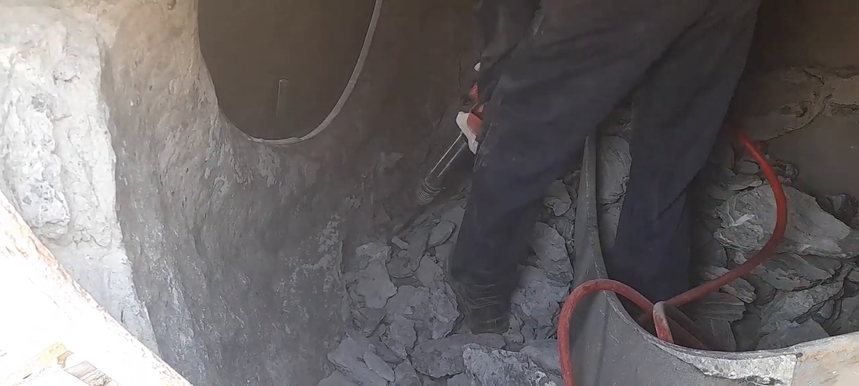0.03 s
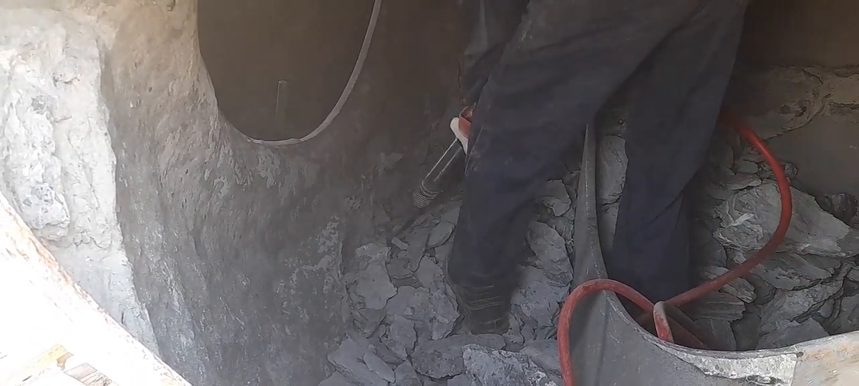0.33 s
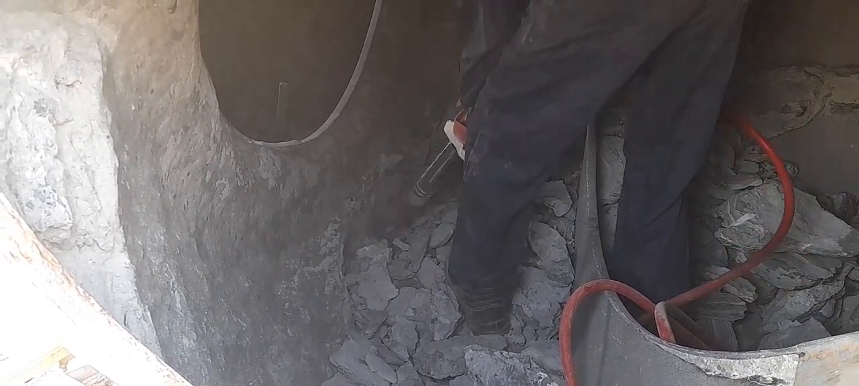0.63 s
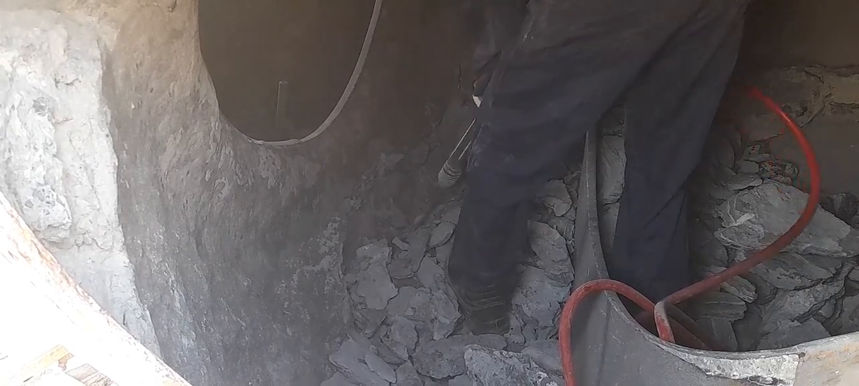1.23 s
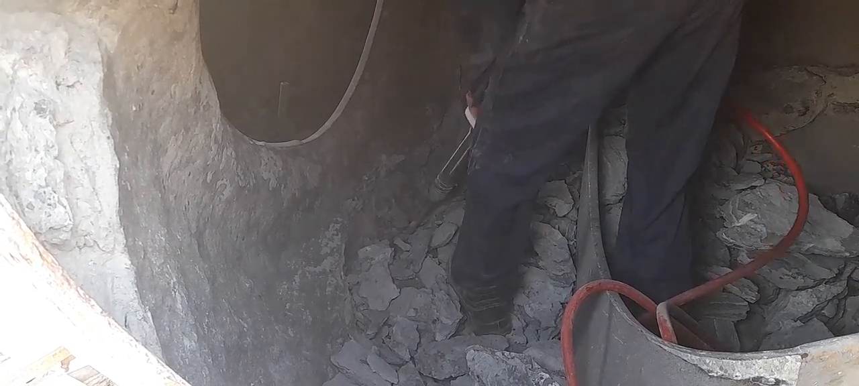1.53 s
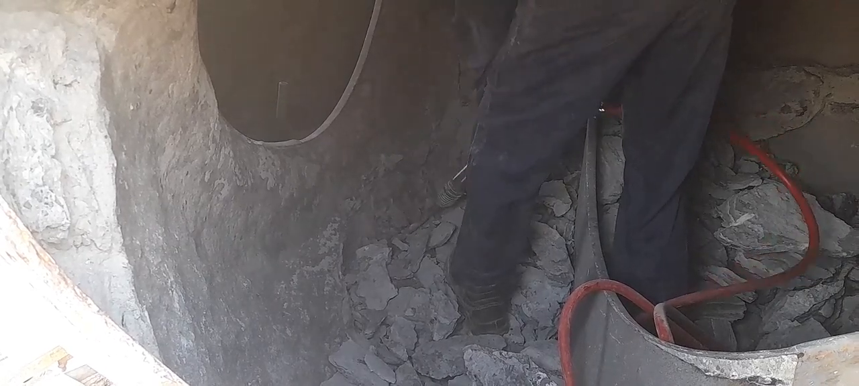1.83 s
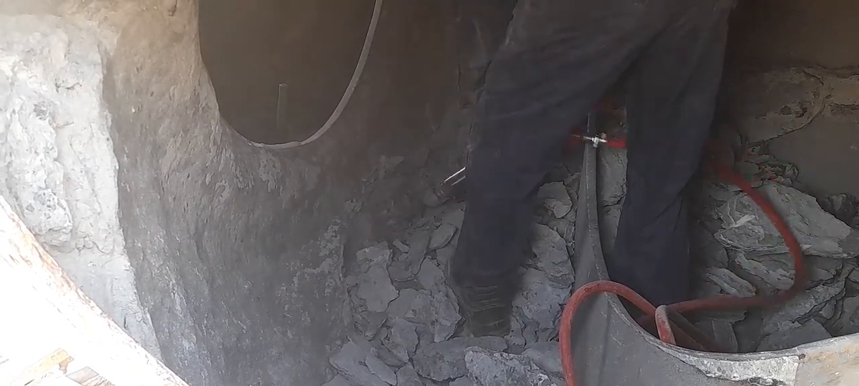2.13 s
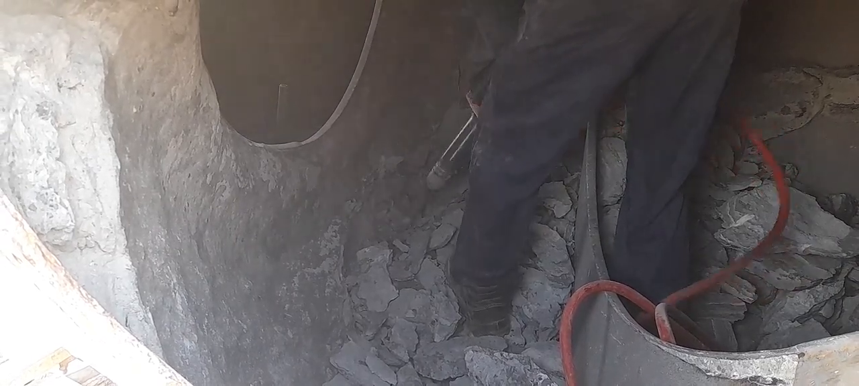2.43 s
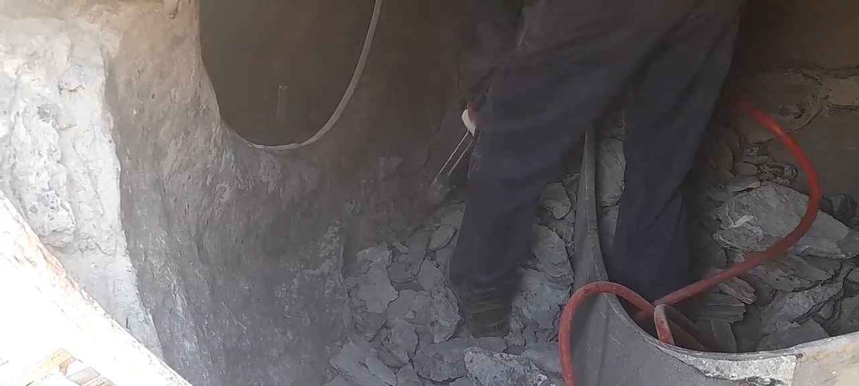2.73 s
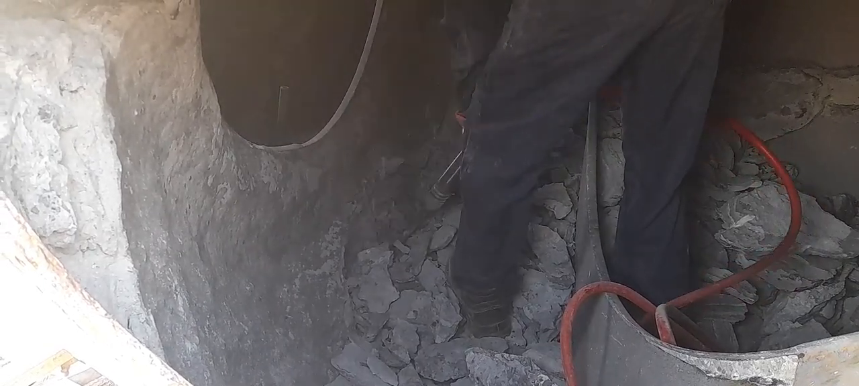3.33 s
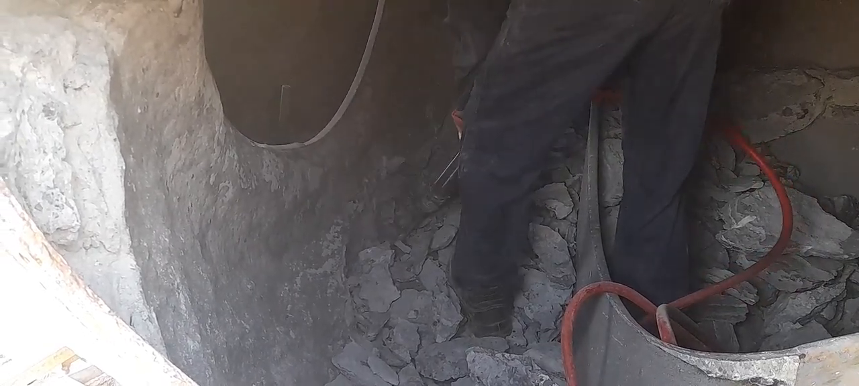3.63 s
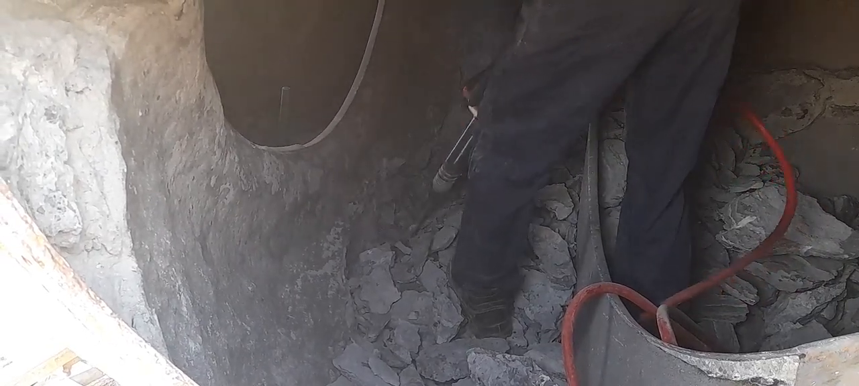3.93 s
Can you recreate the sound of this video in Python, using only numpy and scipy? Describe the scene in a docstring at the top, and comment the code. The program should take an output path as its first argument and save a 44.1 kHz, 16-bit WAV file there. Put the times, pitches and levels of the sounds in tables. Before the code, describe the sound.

Pneumatic hammer breaking concrete in a mixer drum, three rapid bursts over an idling engine.

```python
"""Inside a steel mixer drum, a pneumatic hammer chips concrete in three short bursts while an engine
idles outside. Each blow is a spit of air, a crack and a thud, echoing in the drum over a gritty roar
and exhaust hiss. The loose chisel clinks and chunks of concrete fall. Twice the exhaust air sweeps
the left microphone, which overloads with a flutter that drops in pitch as the jet dies."""
import sys
import numpy as np
from scipy import signal
from scipy.fft import rfft, irfft
from scipy.io import wavfile
from scipy.ndimage import uniform_filter1d, minimum_filter1d, map_coordinates

SR = 44100
rng = np.random.default_rng(int(sys.argv[2]) if len(sys.argv) > 2 else 0)


def unload_wav(signal):
    """Save mono or channel-first audio to the path in sys.argv[1] as 16-bit WAV at rate SR, clipped to [-1, 1]."""
    wavfile.write(
        sys.argv[1],
        SR,
        np.round(np.clip(np.atleast_2d(signal).T, -1, 1) * 32767).astype(np.int16),
    )


N = 176400
T = np.arange(N) / SR


def amp(db):
    """Decibels to gain."""
    return 10 ** (np.asarray(db) / 20)


def sides(left_db, right_db):
    """Stereo placement as a gain per channel."""
    return amp([[left_db], [right_db]])


def unit(x):
    """Scales to rms 1."""
    return x / np.sqrt(np.mean(x ** 2) + 1e-20)


def read(points, hz):
    """Reads a curve on a log-frequency axis."""
    f, value = np.transpose(points)
    return np.interp(np.log(hz + 1), np.log(f + 1), value)


def fader(rows, column=1):
    """Gain over time from a dB column; silent outside the rows."""
    rows = np.array(rows)
    return amp(np.interp(T, rows[:, 0], rows[:, column], left=-120, right=-120))


def add(mix, start_s, sound):
    """Mixes a sound in at start_s."""
    part = mix[..., max(round(start_s * SR), 0):][..., :sound.shape[-1]]
    part += sound[..., :part.shape[-1]]


# Stereo image, wider in the treble: freq_hz, correlation
STEREO_LIKENESS = [(50, 1), (250, 0.45), (700, 0.3), (2000, 0.083), (8000, .1)]

def pair(spectra, hz):
    """Makes two independent spectra partly alike."""
    left, other = spectra
    alike = read(STEREO_LIKENESS, hz)
    return np.array([left, alike * left + np.sqrt(1 - alike ** 2) * other])


def noise(colour):
    """Stereo noise of a given colour, falling away under its lowest point."""
    hz = np.fft.rfftfreq(N, 1 / SR)
    shape = amp(read(colour, hz)) * np.minimum(hz / colour[0][0], 1) ** 2
    white = rfft(rng.standard_normal((2, N)))
    return unit(irfft(pair(white, hz) * shape, N))


def wander(hz):
    """Smooth random motion up to a given rate."""
    rolloff = 1 + (np.fft.rfftfreq(N, 1 / SR) / hz) ** 4
    return unit(irfft(rfft(rng.standard_normal(N)) / rolloff, N))


# Idle hum and the whine above it: cycle_multiple, relative_db
HUM_ORDERS = [(1, -40), (2, -38), (3, -28.5), (4, 2.5), (5, -18.5), (6, -16.5), (7, -18.5), (8, -18),
              (9, -8.5), (10, -18.5), (11, -25), (12, -14.5), (13, -26), (14, -29), (15, -13.5),
              (16, -17.5), (17, -23.5), (18, -19), (19, -26.5), (20, -15), (21, -11), (22, -19.5),
              (23, -21.5), (24, -9.5), (25, -20), (26, -19), (27, -22.5), (28, -11), (29, -21), (30, -24),
              (31, -26), (32, -11.5), (33, -23.5), (34, -30.5)]
WHINE_ORDERS = [(48, -20), (60, -24), (72, -21.5), (84, -22)]
# Clatter colour: freq_hz, gain_db
CLATTER_EQ = [(59, -26), (100, 2.5), (215, -8.5), (244, -6), (452, -7), (481, -9.5), (524, -9.5),
              (634, -13), (768, -12), (1250, -19.5), (1390, -16.5), (4670, -31), (7940, -44.5),
              (12900, -40), (16000, -53.5)]
# Engine fader, pulled down for each burst: time_s, gain_db
ENGINE_FADER = [(0, 0), (.62, 2.1), (.7, -13.1), (.93, -20), (1.02, -2.5), (1.5, -3), (1.98, -2.5),
                (2.06, -7.5), (2.2, -4.5), (2.32, 1.9), (2.8, 1.96), (3.33, 1.1), (3.48, -8), (3.75, -19),
                (3.9, -17), (4, -2)]

def engine(cycle_hz=16.3):
    """Four cylinders idle: a harmonic hum, with clatter that pulses at each firing and each cycle."""
    speed_hz = cycle_hz * (1 + .003 * wander(3.5))
    turn = 2 * np.pi * np.cumsum(speed_hz) / SR
    hum = np.zeros((2, N))
    for order, db in HUM_ORDERS + WHINE_ORDERS:
        phase = order * turn + 2 * np.pi * rng.random()
        stereo_spread = .27 * min(order / 10, 1) * rng.standard_normal((2, 1))
        hum += amp(db) * np.cos(phase + stereo_spread)
    pulse = np.cos(4 * turn) + np.cos(turn)
    clatter = unit(noise(CLATTER_EQ) * np.exp(.1 * pulse))
    return fader(ENGINE_FADER) * (sides(-42.5, -38.5) * unit(hum) + sides(-47.5, -43.07) * clatter)


# The chisel's low and high ring: pitch_hz, relative_db, t60_s
CHISEL_LOW_MODES = [(3030, -13, 0.043), (5450, 4.5, 0.045), (5546, 4.5, 0.025)]
CHISEL_HIGH_MODES = [(8600, -9, 0.24), (9250, -16, .15), (12430, 1, 0.061), (12500, -11, .06)]

def chisel_ring(modes, rub_hz=160, rub_radians=.9, rise_s=.00089):
    """One ring of the steel's modes, roughened by rubbing in the holder."""
    t = T[:SR // 4]
    ring = np.zeros((2, len(t)))
    for hz, db, t60 in modes:
        rub = np.interp(t * rub_hz, np.arange(200), rng.standard_normal(200))
        phase = 2 * np.pi * (hz * t + rng.random((2, 1))) + rub_radians * rub
        ring += amp(db - 60 * t / t60) * np.sin(phase)
    return ring * np.minimum(t / rise_s, 1)


# Chisel clinks: start_s, low_ring_db, high_ring_db, tick_db
CLINK_HITS = [(.002, -35.5, -39, -25.5), (1.070, -51, -52, -60), (1.115, -51, -59, -58),
              (1.488, -55, -66, -49), (1.528, -51, -58, -31), (1.552, -41.5, -48, -47),
              (1.566, -43, -59, -58), (1.5881, -37, -39, -25.5), (2.646, -43, -43.5, -40),
              (2.678, -50, -53, -59.5), (2.7218, -29.5, -40, -30), (2.78, -43, -45, -40),
              (2.809, -35, -41, -41), (2.836, -43, -45, -33.5), (2.861, -55, -55, -35),
              (3.641, -28.5, -18, -36), (3.679, -29, -28, -36), (3.692, -33, -25, -40),
              (3.972, -62, -56, -43)]
# Falling chunks: start_s, level_db
CHUNK_HITS = [(.001, -27.5), (1.590, -38), (1.602, -37), (1.622, -39), (2.850, -26.5)]
# Stony knock, and the bright crack of ticks and hammer blows: freq_hz, gain_db
STONE_EQ = [(300, -12), (850, -8.5), (1100, -3), (1500, -2.5), (1850, -16), (2150, -12), (2600, -8.5),
            (3600, -17.5), (9000, -31)]
CRACK_EQ = [(500, -23.5), (1500, -0.5), (2800, 2.5), (4000, -3.5), (5600, 3), (7700, -11.5), (9800, 2.5),
            (12500, -2.5), (16000, -4.5)]

def chisel_and_chunks(tick_decay_s=.00067, knock_decay_s=.0035):
    """The chisel rattles in its holder and chunks knock on the rubble; both echo in the drum."""
    t = T[:SR // 20]
    steel, tick, knock = np.zeros((2, N)), np.zeros(N), np.zeros(N)
    for start_s, low_db, high_db, tick_db in CLINK_HITS:
        add(steel, start_s, amp(low_db) * chisel_ring(CHISEL_LOW_MODES))
        add(steel, start_s, amp(high_db) * chisel_ring(CHISEL_HIGH_MODES))
        add(tick, start_s, amp(tick_db) * np.exp(-t / tick_decay_s))
    for start_s, db in CHUNK_HITS:
        add(knock, start_s, amp(db) * np.exp(-t / knock_decay_s))
    ticks, stone = tick * noise(CRACK_EQ), knock * noise(STONE_EQ)
    echo = drum_echo(.22 * steel + stone + 1.43 * ticks)
    return (steel + ticks) * sides(-4.5, 0) + stone + amp(-6.5) * echo


# Reverb time of the drum: freq_hz, t60_s
DRUM_DECAY = [(100, .5), (500, 0.55), (2000, 0.64), (6000, 0.51), (10000, 0.24), (16000, 0.38)]

def drum_echo(send, build_s=.0045):
    """Dense echoes off the steel walls, each band dying at its own speed."""
    hz, t, bands = signal.stft(rng.standard_normal((2, SR)), SR, nperseg=256)
    bands = pair(bands, hz[:, None]) * amp(-60 * t / read(DRUM_DECAY, hz)[:, None])
    tail = signal.istft(bands, SR, nperseg=256)[1][:, :SR]
    tail *= 1 - np.exp(-T[:SR] / build_s)
    mono = send.mean(0)[None] * np.sqrt(2)
    return signal.fftconvolve(mono, tail / np.linalg.norm(tail[0]), axes=1)[:, :N]


# Hammer blows: start_s, crack_db, thud_db
BLOW_HITS = [(0.562, -30, -20), (.599, -19, -24), (.606, -24.5, -9.5), (0.652, -14, -17),
             (0.699, -15.5, -44), (0.742, -14, -13.5), (0.778, -16.5, -36), (0.825, -18, -19),
             (0.873, -23.5, -48), (0.962, -30, -40), (1.993, -16, -9.5), (2.034, -14, -8.5),
             (2.077, -16.5, -23), (2.116, -15, -13), (2.159, -18.5, -25), (2.199, -16.5, -17),
             (2.247, -21.5, -33), (2.320, -18, -29), (2.460, -29.5, -33), (2.54, -36, -48),
             (3.298, -17, -13.5), (3.354, -13.5, -13), (3.403, -13.5, -9.5), (3.452, -15, -21),
             (3.497, -11.5, -10), (3.539, -13.5, -13), (3.582, -12.5, -12.5), (3.629, -14.5, -12),
             (3.673, -9, -8.5), (3.726, -17, -14), (3.812, -42, -42)]
# Dull body of a blow: freq_hz, gain_db
THUD_EQ = [(50, -22.5), (150, -4), (300, 3.5), (550, 2), (850, -5), (1250, -2), (1900, -30), (2800, -19),
           (5000, -31.5)]

def hammer(rise_s=.0016, crack_decay_s=.0039, thud_decay_s=.0033, spit_s=.0061):
    """The valve spits just before the piston lands, then concrete cracks over a dull thud."""
    t, crack, thud = T[:SR // 10], np.zeros(N), np.zeros(N)
    rise = np.minimum(t / rise_s, 1)
    after_peak = np.maximum(t - rise_s, 0)
    for start_s, crack_db, thud_db in BLOW_HITS:
        add(crack, start_s - spit_s, amp(crack_db - 10.5) * rise * np.exp(-t / spit_s))
        add(crack, start_s, amp(crack_db) * rise * np.exp(-after_peak / crack_decay_s))
        add(thud, start_s, amp(thud_db) * rise * np.exp(-after_peak / thud_decay_s))
    blows = crack * noise(CRACK_EQ) + thud * noise(THUD_EQ)
    return blows * sides(-9, -8) + amp(-11.5) * drum_echo(blows)


# Swells, one list per burst: time_s, roar_db, hiss_db
BURST_FADERS = [
    [(.595, -62, -48), (.62, -34, -41), (.68, -41, -64), (.73, -43.5, -49), (.82, -38.5, -38),
     (.9, -37.5, -46.5), (.98, -47, -56), (1.1, -51, -59), (1.2, -59, -76)],
    [(1.92, -80, -83), (1.95, -58, -55), (1.99, -43, -56), (2.03, -50, -53), (2.07, -38.5, -37.5),
     (2.2, -34, -35), (2.3, -34.5, -37), (2.4, -41, -46.5), (2.52, -49, -55), (2.65, -65, -65)],
    [(3.22, -51, -59.5), (3.3, -47.5, -59), (3.37, -36.5, -54), (3.48, -31.5, -59), (3.6, -32.5, -60),
     (3.72, -33, -40), (3.79, -36.5, -51), (3.87, -57, -61), (3.97, -70, -73)],
]
# Bright air jet in the first and last bursts: time_s, level_db
JET_FADER = [(.59, -62), (.605, -29.5), (.68, -53), (.72, -41), (.81, -40), (.9, -55), (1.0, -82),
             (3.25, -86), (3.35, -50), (3.45, -35.5), (3.58, -32.5), (3.64, -30), (3.72, -30.5),
             (3.78, -40.5), (3.88, -60)]
# Colours of the three layers: freq_hz, gain_db
ROAR_EQ = [(47, -38), (80, -4), (147, 0.5), (184, -5), (246, 1.5), (407, -9), (444, -2), (537, 0),
           (983, -11.5), (1250, -8), (1680, -22.5), (2000, -20.5), (2680, -13), (3240, -24), (5000, -23),
           (6500, -49.5), (11000, -120)]
HISS_EQ = [(1500, -17.5), (2800, -3), (4200, -3.5), (5300, -0.5), (6300, 5.5), (7100, -7.5), (7900, -10),
           (8800, 1), (9900, -6), (11200, -4.5), (12400, 1), (14000, -4.5), (16000, -8.5)]
JET_EQ = [(7500, -27.5), (8900, -7.5), (9500, -3.5), (9800, 3.5), (10300, -3.5), (11400, -7), (12800, -6.5),
          (15000, -22.5)]

def roar_and_exhaust(grit_hz=250, grit_db=1.8):
    """The shaken drum roars and the exhaust hisses, swelling with each burst."""
    roar = sum(fader(burst, column=1) for burst in BURST_FADERS) * noise(ROAR_EQ)
    hiss = sum(fader(burst, column=2) for burst in BURST_FADERS) * noise(HISS_EQ)
    grit = amp(grit_db * wander(grit_hz))
    jet = fader(JET_FADER) * noise(JET_EQ) * sides(0, -6)
    return (roar + hiss) * grit + jet


# Low rumble of air on the microphone: time_s, level_db
BUFFET_FADER = [(.64, -70), (.68, -45), (.96, -28), (1.0, -57), (3.7, -72), (3.76, -34), (3.812, -21.5),
                (3.86, -24.5), (3.95, -34.5), (3.99, -64)]
# Its colour: freq_hz, gain_db
BUFFET_EQ = [(40, -30), (65, 2), (140, -6), (400, -25), (1500, -25), (6000, -68)]

def buffet():
    """Exhaust air buffets the microphone with a soft-clipped rumble."""
    return 1.4 * fader(BUFFET_FADER) * np.tanh(noise(BUFFET_EQ)[0])


# Flutter, one list per gust: time_s, base_rate_hz, level_db
GUST_SWEEPS = [
    [(.66, 1499, -51), (.665, 1695, -17), (.688, 800.5, -20), (.696, 1409, -27.5), (.72, 2391, -16.5),
     (.80, 2306, -23.5), (.86, 1901, -19), (.88, 2206, -19.5), (.91, 1198, -20), (.935, 803, -12),
     (.961, 351, -27), (.965, 2670, -18), (.968, 2440, -24), (.970, 200, -21), (.985, 99, -38)],
    [(3.69, 1593, -38), (3.715, 1904, -19.5), (3.74, 1896, -28), (3.767, 2208, -17), (3.806, 598.4, -28),
     (3.817, 2220, -26.5), (3.833, 1100, -15), (3.845, 486, -18.5), (3.856, 858, -24.5), (3.90, 478.4, -19),
     (3.935, 299.5, -19), (3.955, 151, -10.5), (3.975, 101, -37)],
]

def flutter(gust, swirl_per_cycle=.55, eddies_per_cycle=3, swirl_limit=2.2, low_cut_hz=94):
    """The overloaded microphone swings faster and slower with each eddy; rates follow the jet's speed."""
    times, rates, _ = np.transpose(gust)
    base_hz = np.exp(np.interp(T, times, np.log(rates)))
    cycles = np.cumsum(base_hz) / SR
    swirl, eddies = (map_coordinates(rng.standard_normal(N), [cycles * rate], order=3, mode="wrap")
                     for rate in (swirl_per_cycle, eddies_per_cycle))
    swing_hz = base_hz * (.25 + swirl_limit * np.tanh(swirl / swirl_limit))
    flow = np.sin(2 * np.pi * np.cumsum(swing_hz) / SR) + .44 * eddies
    low_cut = signal.butter(2, low_cut_hz, "highpass", fs=SR, output="sos")
    return signal.sosfilt(low_cut, fader(gust, column=2) * unit(flow))


def scene():
    """The stereo mix, with flutter and buffeting on the left only."""
    mix = hammer() + roar_and_exhaust() + chisel_and_chunks()
    mix[0] += sum(flutter(gust) for gust in GUST_SWEEPS) + buffet()
    return mix + engine()


def record(dry, ceiling_db=-14, window_s=.0011, high_cut_hz=16050):
    """A fast peak limiter on each channel, then a steep high cut."""
    size = round(window_s * SR)
    needed_gain = np.minimum(amp(ceiling_db) / (abs(dry) + 1e-9), 1)
    held_gain = minimum_filter1d(needed_gain, size, axis=1)
    limited = dry * uniform_filter1d(held_gain, size, axis=1)
    high_cut = signal.firwin(511, high_cut_hz, window=("kaiser", 9), fs=SR)
    return signal.oaconvolve(limited, high_cut[None], "same")


dry = scene()
out = record(dry)
unload_wav(out)
```